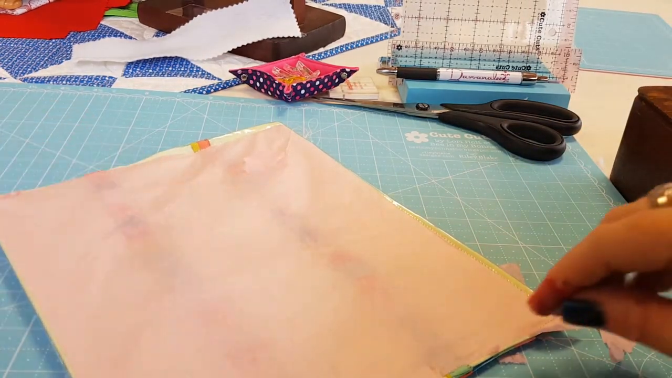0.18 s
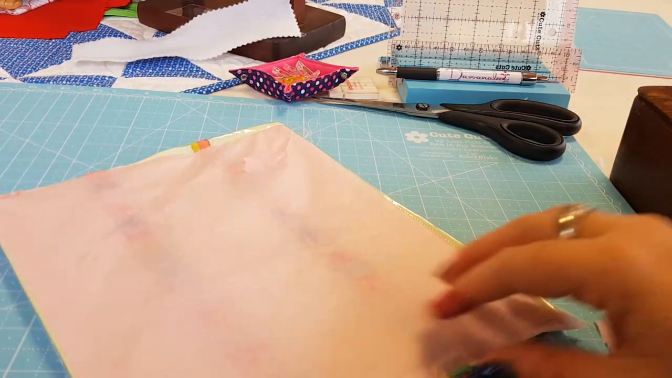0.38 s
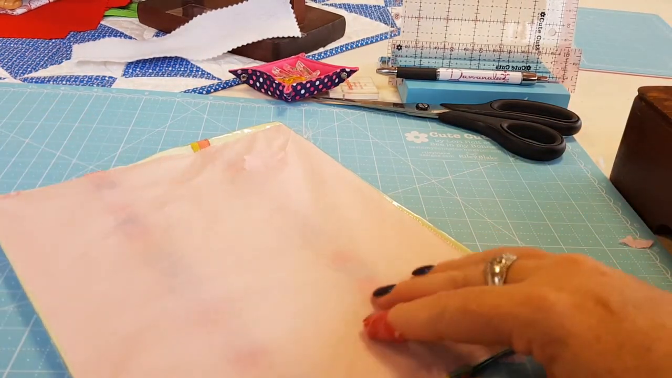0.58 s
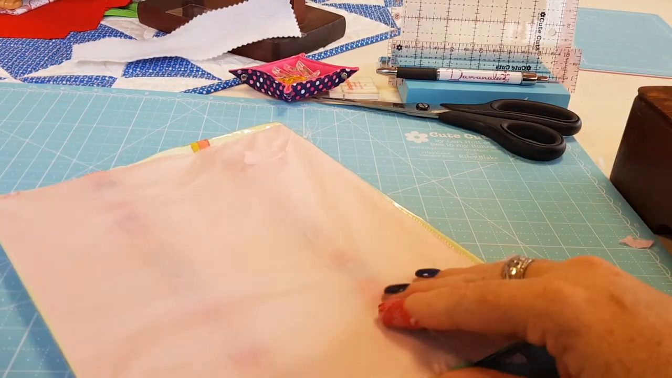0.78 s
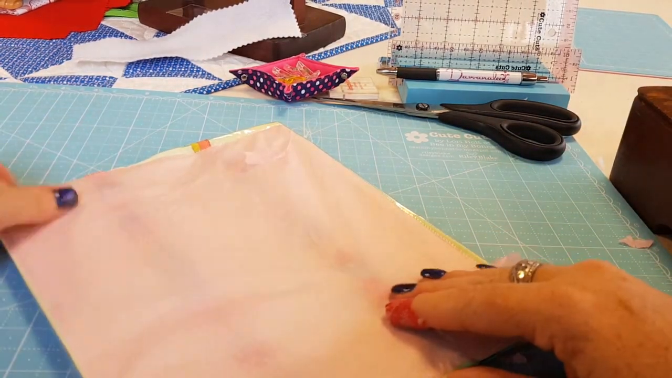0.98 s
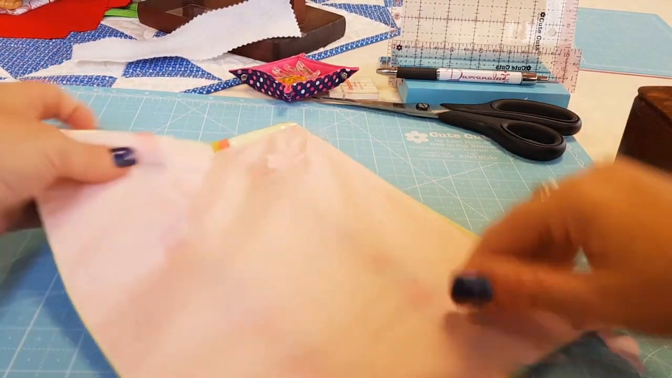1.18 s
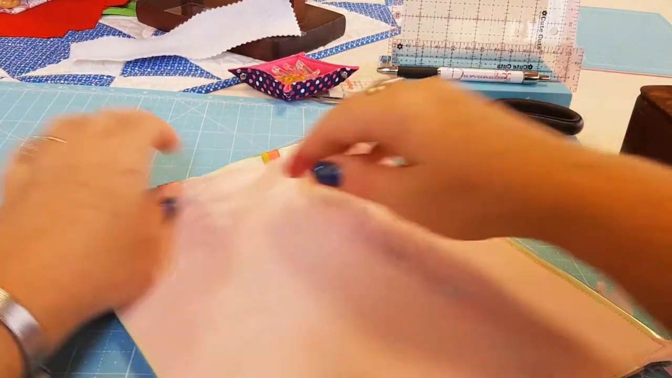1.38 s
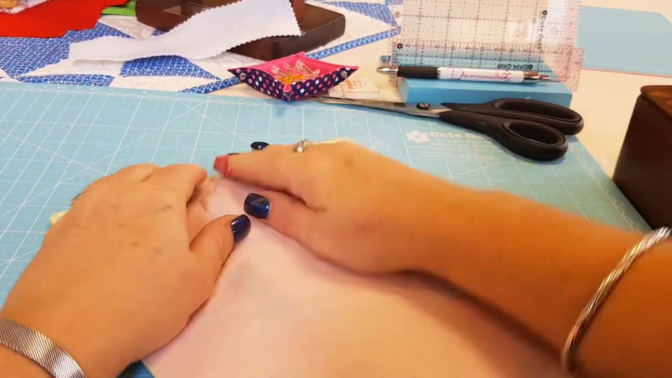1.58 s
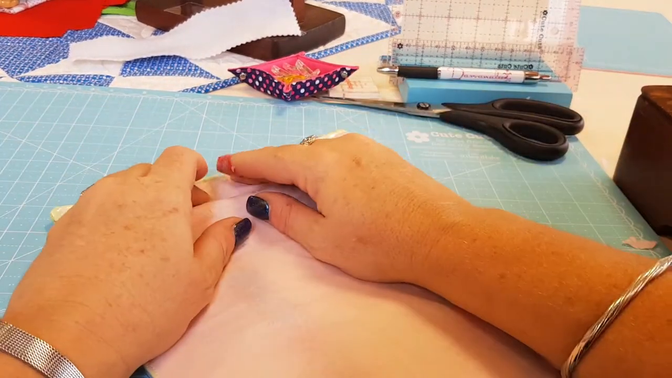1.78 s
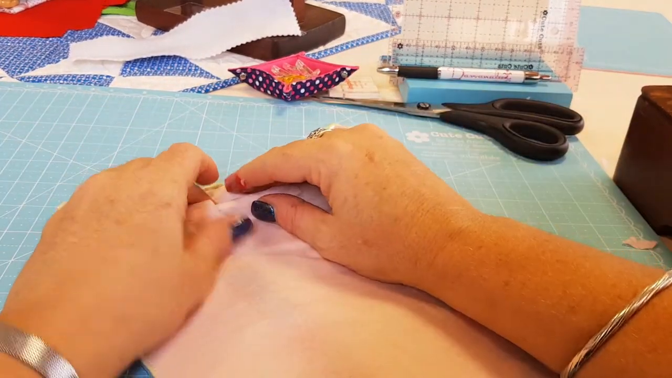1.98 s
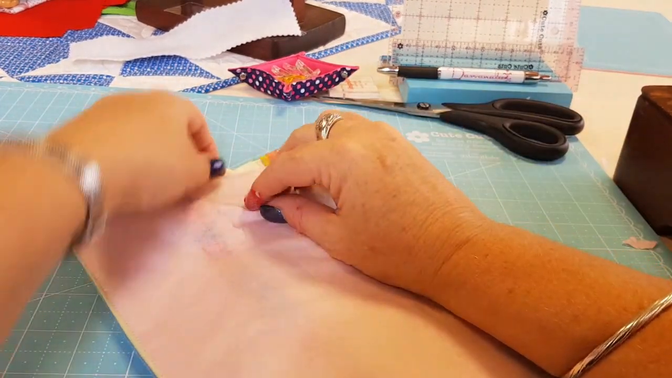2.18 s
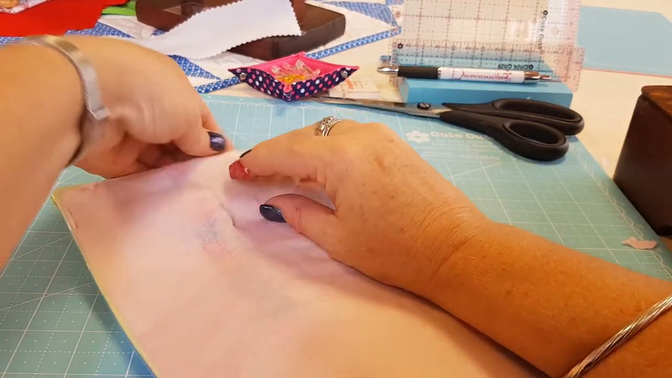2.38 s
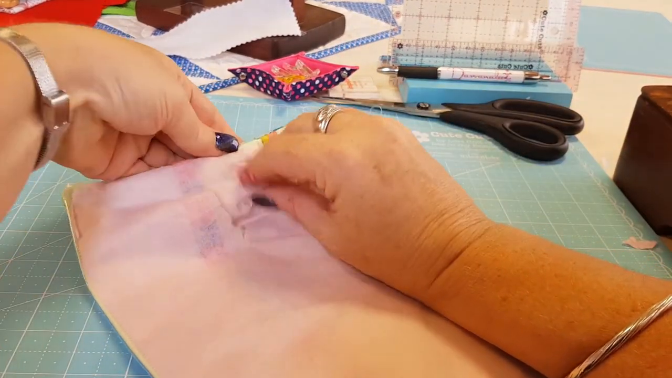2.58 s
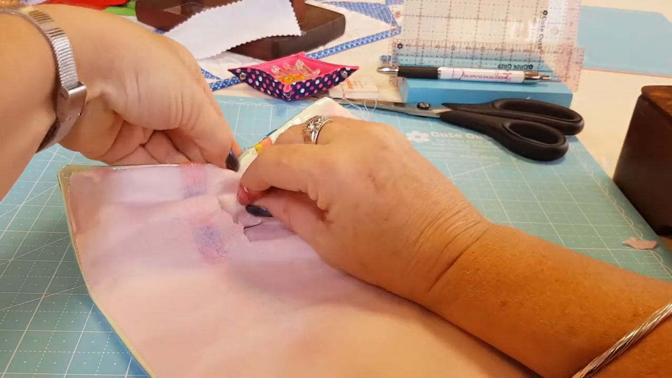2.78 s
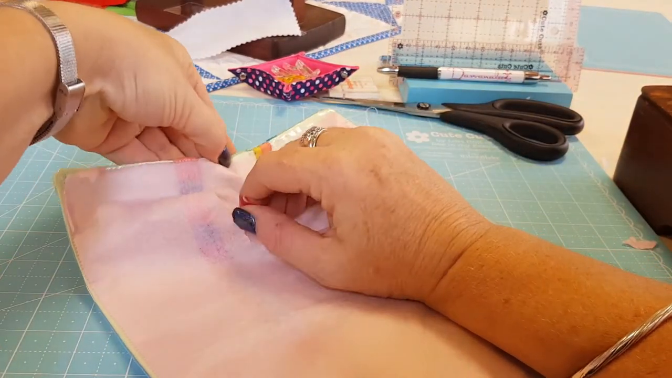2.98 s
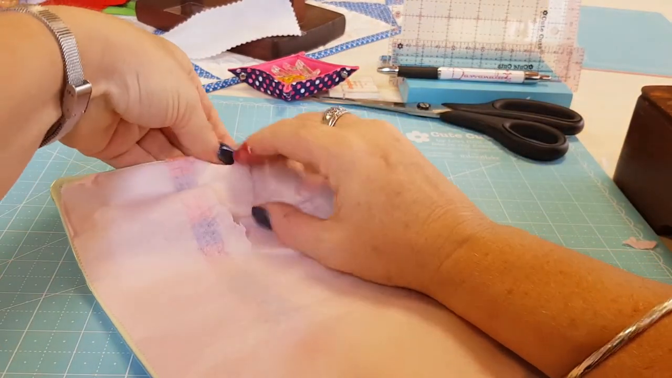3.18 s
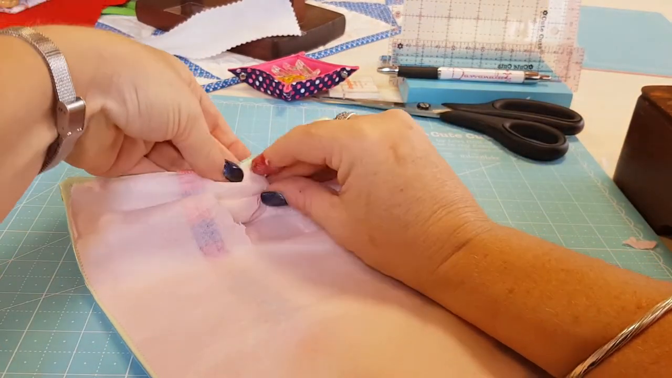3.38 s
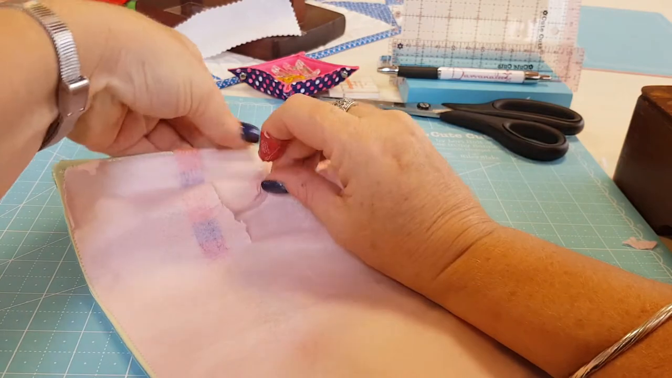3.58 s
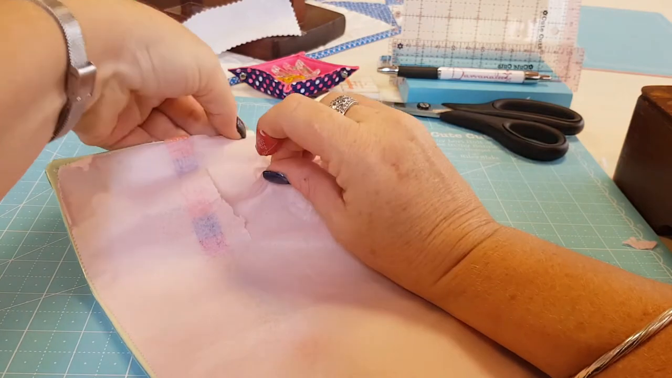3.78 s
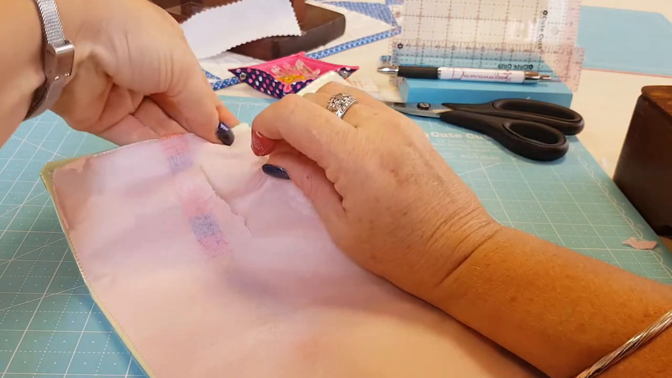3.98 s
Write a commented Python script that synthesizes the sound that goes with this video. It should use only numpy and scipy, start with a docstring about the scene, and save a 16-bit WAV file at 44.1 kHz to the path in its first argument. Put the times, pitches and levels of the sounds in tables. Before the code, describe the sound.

Thin tissue paper is handled and torn close to stereo microphones in a small room with faint low hum. Brief crackle at 0 s, snaps with dull table knocks at 0.2-0.35, low air puffs on the left around 0.8 and 1.0, sharp nail taps at 0.9. Crisp rips at 1.05-1.3, softer rustling with light knocks to 2.1, a thump at 2.1, then dense irregular snapping and crinkling from 2.25 to 4.

```python
"""Hands handle and tear thin tissue paper on a craft table, close to two microphones in a small room.
From the start an appliance hums over soft room noise and the paper crackles: clumps of tiny fibre breaks and
creases. At 0.2 s come the first snaps (noise bursts with a ring) and hand knocks (ringing table modes). Air
puffs (short damped swings) then reach the left microphone, and near 0.9 s nails tap the mat (a dent and a
click). More snaps follow, crowded after 2.2 s. The walls answer paper, taps and knocks with fading noise."""
import sys
import numpy as np
from scipy import signal
from scipy.fft import rfft, irfft, next_fast_len
from scipy.io import wavfile
from scipy.ndimage import map_coordinates

SR = 44100
rng = np.random.default_rng(int(sys.argv[2]) if len(sys.argv) > 2 else 0)


def materialize(psi):
    """Save the field psi as 16-bit PCM at rate SR to the path in sys.argv[1].

    A 1-D psi becomes a single channel; in a 2-D psi each row is a channel.
    """
    bounded = np.clip(np.atleast_2d(psi).T, -1, 1)
    quanta = np.round(bounded * 32767).astype(np.int16)
    wavfile.write(sys.argv[1], SR, quanta)


def level_to_linear(level):
    """Convert decibel levels to linear amplitude factors, elementwise."""
    exponent = np.asarray(level, float) / 20
    return 10 ** exponent


N = 176400  # samples, 4 s


def unit(x):
    """Scale to rms 1."""
    return x / np.sqrt(np.mean(x ** 2) + 1e-20)


def along(points, hz):
    """Read a curve of (frequency, value) points on a log frequency axis."""
    f, v = np.transpose(points)
    return np.interp(np.log(hz + 1), np.log(f + 1), v)


def wobble(rate):
    """A smooth random curve through a given number of random points a second."""
    return map_coordinates(rng.standard_normal(4000), [np.arange(N) * rate / SR])


def filtered(x, response):
    """Multiply the spectrum of x by a response that depends on frequency."""
    m = next_fast_len(N + SR // 2)
    return irfft(rfft(x, m) * response(np.fft.rfftfreq(m, 1 / SR)), m)[..., :N]


def pan(db):
    """Left and right gains for a left-right difference in dB."""
    return level_to_linear(np.array([db / 2, -db / 2]))


def add(out, s, sound):
    """Mix a stereo sound in at time s."""
    part = out[:, max(round(s * SR), 0):][:, :sound.shape[1]]
    part += sound[:, :part.shape[1]]


# how far the left microphone hears the hands ahead of the right: time_s, lead_samples
LEFT_LEAD = [(0, 12), (.7, 13), (1.2, 6), (4, 3.8)]


def lead(s):
    """Samples by which sound from the working hands reaches the left microphone first."""
    return np.interp(s, *np.transpose(LEFT_LEAD))


# how much louder the paper is on the left: time_s, left_over_right_db
LEFT_LEAN = [(.25, 3), (.55, 1), (.95, 2.5), (1.3, 1), (2.3, 1.1), (4, 1.5)]


def lean_db(s):
    """Left-right level difference of the paper at time s."""
    return np.interp(s, *np.transpose(LEFT_LEAN))


def both_arrivals(at, scatter):
    """Arrival samples at left and right; scatter stands for each break's own place on the paper."""
    right = np.clip(at + lead(at / SR) + 4.1 * scatter, 0, N - 1)
    return at.astype(int), right.astype(int)


# how alike the two microphones hear the room: pitch_hz, likeness (1 = the same, 0 = unrelated)
LIKENESS = [(40, 0.9), (100, 1), (300, 0.95), (600, 0.15), (1500, 0.074), (5000, 0.048)]
# tones of the appliance: pitch_hz, level_db (rms before the wavering)
HUM_TONES = [(48.4, -49.5), (96.9, -55.5), (145.3, -56), (301.5, -69.5), (387.6, -74.5), (586.8, -68.5)]


def hum():
    """An appliance motor gives steady tones that waver slightly in level and phase."""
    t = np.arange(N) / SR
    tones = np.zeros(N)
    for hz, db in HUM_TONES:
        level = np.sqrt(2) * level_to_linear(db + 2.5 * wobble(5.46))
        phase = 0.2 * wobble(3.9) + rng.uniform(0, 2 * np.pi)
        tones += level * np.sin(2 * np.pi * hz * t + phase)
    late = np.roll(tones, round(0.0017 * SR))  # the right hears it 1.7 ms later
    return pan(0.6)[:, None] * np.array([tones, late])


# tone colour of the room noise: pitch_hz, relative_level_db (per Hz)
ROOM_NOISE = [(25, -9.5), (45, -15), (75, -9.5), (120, -12), (200, -13), (335, -17), (430, -17), (641, -20),
              (800, -32.5), (1130, -42), (2000, -42.5), (4250, -50.5), (7000, -54), (16000, -50)]


def room_tone():
    """Stereo noise with a drifting level; a shared and an opposed part make the low end alike."""
    def shape(hz):
        turn = np.arccos(np.clip(along(LIKENESS, hz), -1, 1)) / 2
        return level_to_linear(along(ROOM_NOISE, hz)) * [np.cos(turn), np.sin(turn)]
    mid, side = filtered(rng.standard_normal((2, N)), shape)
    level_db = -50.5 + 4.1 * wobble(4.95)
    return level_to_linear(level_db) * unit(np.array([mid + side, mid - side]))


def crackle(count, spread_db, spectrum):
    """Fibres break at random times and sizes; each break is a tiny cluster of clicks."""
    at = rng.random(count) * N
    size = level_to_linear(spread_db * rng.standard_normal(count)) * rng.choice([-1, 1], count)
    arrivals = both_arrivals(at, rng.standard_normal(count))
    hits = np.array([np.bincount(p, size, N) for p in arrivals])

    def burst(hz):
        grain_s = 0.000589  # spacing of the clicks in a cluster
        smear = np.exp(2j * np.sin(2 * np.pi * hz * grain_s))  # spreads in time, keeps the colour
        return smear * level_to_linear(along(spectrum, hz))
    own_clumps = level_to_linear(1 * wobble(200))
    return unit(own_clumps * filtered(hits, burst))


def flutter(count):
    """Creases pop as short damped rings, each with its own pitch, size and place."""
    t = np.arange(SR // 300)[None]  # samples
    at = rng.random(count) * N
    pitch, size, scatter, phase = rng.standard_normal((4, count, 1))
    hz = np.clip(3000 * 2 ** (0.81 * pitch), 1150, 15000)
    life = 5.7 * SR / hz  # 5.7 cycles, in samples
    fade = np.exp(-t / life) * (1 - np.exp(-t / 4))
    ring = level_to_linear(5.5 * size) * np.sin(2 * np.pi * hz * t / SR + 9 * phase) * fade
    arrivals = both_arrivals(at, scatter[:, 0])
    return unit(np.array([np.bincount((p[:, None] + t).ravel(), ring.ravel(), N + SR)[:N]
                          for p in arrivals]))


# pull on the paper: time_s, effort_db, crispness_db (tilts from sheet flutter towards fibre ticks)
PULLS = [(0.0, -49.5, -7), (0.09, -77.5, 12), (0.191, -74.5, -3), (0.208, -45.5, -1.5), (0.31, -59, -14.5),
         (0.41, -71, -8), (0.52, -65.5, -9), (0.555, -66, -1), (0.58, -50.5, 7), (0.62, -58.5, 1),
         (0.66, -65.5, 4), (0.87, -75, -12), (0.93, -65.5, -11), (0.96, -55.5, -17), (1.05, -50, 1),
         (1.17, -48, 4.5), (1.26, -55, -5), (1.281, -41, 1), (1.305, -50.5, -3.5), (1.338, -56.5, 5),
         (1.54, -48.5, -5), (1.69, -53, -1.5), (2.13, -48.5, -3), (2.27, -62, 5.5), (2.33, -46, 12.5),
         (2.361, -59.5, 0.5), (2.568, -42.5, 1), (2.7, -54, 1), (2.881, -44.5, -2), (3.02, -55.5, -3),
         (3.2, -42.5, 1.5), (3.52, -56.5, -5.5), (3.65, -49, 0), (3.75, -61, -4), (3.82, -57.5, 2),
         (3.85, -57, -0.5), (3.97, -58.5, -2), (4.0, -51.5, 5)]
# tone colour of the crisp fibre ticks: pitch_hz, relative_level_db (per Hz)
TICK_COLOUR = [(1500, -13), (3000, -19), (4600, -7.5), (7000, -2), (9000, -4), (11500, -1), (14000, -4),
               (16000, -7)]
# tone colour of the duller sheet flutter: pitch_hz, relative_level_db (per Hz)
SHEET_COLOUR = [(290, -20), (500, -4.5), (592, 0.5), (972, -14), (1410, 1), (1700, -1), (2320, 0),
                (3500, -3.5), (6040, -13), (8500, -12.5), (12000, -16), (19800, -120)]


def paper():
    """The pull drives crisp fibre ticks and the duller sheet with its pops; both come in clumps."""
    now = np.arange(N) / SR
    s, *cols = np.transpose(PULLS)
    effort_db, crisp_db = [np.interp(now, s, c) for c in cols]
    clumps = unit(level_to_linear(2.2 * wobble(200)))
    # over 4 s: 5000 ticks, 3000 flutters and 900 pops a second
    ticks = level_to_linear(-0.5 + crisp_db / 2) * crackle(4 * 5000, 6.5, TICK_COLOUR)
    sheet = crackle(4 * 3000, 5, SHEET_COLOUR) + level_to_linear(-5) * flutter(4 * 900)
    sheet = level_to_linear(-1.5 - crisp_db / 2) * sheet
    return clumps * level_to_linear(effort_db) * pan(lean_db(now)) * (ticks + sheet)


# single loud breaks: start_s, level_db, pitch_hz (of the sheet), length_ms (it is loudest a third in)
LOUD_BREAKS = [(0.204, -39, 1720, 3.4), (0.2833, -35.5, 4180, 3.3), (0.397, -60, 2600, 1.7),
               (0.551, -48, 5000, 2.2), (0.5205, -45.5, 2230, 2.2), (0.673, -52, 4230, 3.6),
               (0.7083, -48, 4270, 1.8), (0.7517, -54.5, 3320, 3.1), (1.057, -34, 7400, 6.2),
               (1.078, -34.5, 2840, 4.8), (1.103, -43, 12200, 3), (1.1474, -31.5, 11400, 1.9),
               (1.155, -31, 12000, 1.9), (1.216, -38.5, 10000, 2), (1.242, -40, 10100, 2.3),
               (1.263, -33, 1980, 4.4), (1.5294, -32, 2060, 3), (1.861, -33.5, 1410, 3.5),
               (1.875, -33, 1440, 2), (1.887, -37, 2000, 2.5), (1.97, -50, 1400, 4.1),
               (2.2546, -36, 3840, 1.5), (2.288, -38, 5200, 2.5), (2.3256, -28, 4910, 1.1),
               (2.395, -36.5, 2240, 3.7), (2.457, -36.5, 5340, 2.3), (2.4851, -27, 5330, 1.7),
               (2.509, -28.5, 1880, 2.2), (2.5475, -43.5, 1420, 5), (2.573, -26, 3970, 9.5),
               (2.625, -27.5, 6040, 5.4), (2.66, -31.5, 6050, 1.7), (2.6844, -36.5, 6400, 1.5),
               (2.7313, -31.5, 3070, 2.4), (2.804, -31.5, 11100, 2.3), (3.1025, -32, 4900, 2.7),
               (3.188, -31.5, 7040, 2.8), (3.242, -46, 11000, 1.7), (3.26, -43, 12500, 3.3),
               (3.27, -31, 2200, 3.2), (3.3214, -34.5, 3400, 3.8), (3.337, -33, 11800, 2.8),
               (3.377, -33.5, 6500, 2.2), (3.405, -35, 8900, 1.9), (3.432, -37.5, 5900, 2.5),
               (3.497, -35, 4200, 1.1), (3.524, -38.5, 7900, 4), (3.5698, -36, 3030, 7.7),
               (3.6014, -35.5, 1760, 7), (3.621, -39, 9000, 2.5), (3.632, -30.5, 3000, 4.8),
               (3.65, -30.5, 1950, 3.1), (3.78, -35.5, 8100, 2.6), (3.8002, -36, 7000, 3.9),
               (3.8154, -30.5, 2180, 1.9), (3.928, -42, 4340, 3.6), (3.958, -30.5, 2000, 2.8)]


def snaps():
    """A break is a short broad crack that swells and dies, part of it ringing at the sheet's pitch."""
    ring_db, crack_db = -3.479, -5.598
    span = 3.2  # the crack reaches this many times below and above the pitch
    out, t = np.zeros((2, N)), np.arange(SR // 25) / SR
    for s, db, hz, ms in LOUD_BREAKS:
        u = 3 * t / (np.clip(ms, 1, 30) / 1000)
        noise = rng.standard_normal((3, len(t))) * u * np.exp(1 - u)
        band = [hz / span, min(hz * span, SR // 2 - 1000)]
        noise = signal.lfilter(*signal.butter(1, band, 'band', fs=SR), noise)
        ring = signal.lfilter(*signal.iirpeak(hz, 3.5, SR), noise[0])
        shared = level_to_linear(ring_db) * ring / np.abs(ring).max() + level_to_linear(crack_db) * noise[0]
        pair = np.array([shared, np.roll(shared, int(lead(s)))])
        pair += level_to_linear(crack_db) * noise[1:]  # each microphone's own part
        add(out, s, level_to_linear(db) * pan(lean_db(s))[:, None] * pair)
    return out


# hands on the table: start_s, level_db, pitch_hz (of the spot that is hit)
HAND_KNOCKS = [(.204, -29.5, 375), (.21, -23.5, 375), (.221, -22, 330), (0.227, -21.5, 132),
               (.2665, -17.5, 360), (0.267, -19, 930), (.284, -25, 260), (0.311, -21, 112),
               (.335, -33.5, 90.5), (0.904, -27.5, 216), (0.933, -28, 950), (0.96, -29, 1130),
               (1.759, -31, 297), (1.773, -35, 453), (1.86, -29, 535), (1.874, -39.5, 460),
               (1.885, -36, 300), (1.971, -32, 590), (1.98, -34, 344), (2.118, -20, 318), (2.127, -36, 233),
               (2.146, -33, 330), (2.5, -29.5, 89), (3.536, -37, 545), (3.632, -33.5, 243)]
# ringing modes of the table top: pitch_hz, level_db, fade_s (time to fall by 60 dB)
TABLE_MODES = [(75, 2.5, 0.19), (116.3, 0.5, 0.1), (143.1, -10, 0.27), (182, -5, 0.14), (285.4, -9, 0.11),
               (330, -2, 0.036), (393.5, -0.5, 0.039), (469, -4, 0.042), (545, -7, 0.056), (707, -5, 0.033),
               (930, -9, 0.038), (1150, -14.5, 0.068)]


def table():
    """Each soft knock rings the table's modes, most those near its pitch; low modes swell more slowly."""
    out, t = np.zeros((2, N)), np.arange(SR // 3) / SR
    for s, db, spot_hz in HAND_KNOCKS:
        ring = np.zeros(len(t))
        for hz, level, t60 in TABLE_MODES:
            level_scatter, pitch_scatter = rng.standard_normal(2)
            off_spot_db = 10 * abs(np.log2(hz / spot_hz))  # 10 dB an octave
            fade = level_to_linear(level - off_spot_db + 1.5 * level_scatter - 60 * t / t60)
            swell = 1 - np.exp(-t * hz / 0.62)
            ring += fade * swell * np.sin(2 * np.pi * hz * (1 + 0.053 * pitch_scatter) * t)
        pair = np.array([ring, np.roll(ring, int(lead(s) / 3))])
        add(out, s, -level_to_linear(db - 0.5) * pan(1)[:, None] * pair)
    return out


# air puffs in the left microphone: start_s, level_db, pitch_hz
AIR_PUFFS = [(.764, -15, 109), (0.7746, -15.5, 127), (0.779, -17, 120), (0.802, -16, 100),
             (0.826, -18.5, 105), (0.8394, -15.5, 112), (0.988, -17.5, 106), (1.001, -20.5, 109),
             (1.018, -13, 111), (1.078, -23.5, 75), (1.291, -31, 90.5), (2.209, -19.5, 99),
             (2.527, -29, 83), (0.452, -35, 78.4), (0.571, -37, 80.4)]


def puffs():
    """Moving air gives one push and its swing back, 34 dB weaker on the right."""
    out, t = np.zeros((2, N)), np.arange(SR // 10) / SR
    for s, db, hz in AIR_PUFFS:
        fade = np.exp(-t * hz / 0.89) * (1 - np.exp(-t * hz * 9))
        push = np.sin(2 * np.pi * hz * t) * fade
        add(out, s, level_to_linear([[db], [db - 34]]) * push)
    return out


# fingernails tapping the mat on the left: start_s, level_db
NAIL_TAPS = [(0.8851, -33), (0.907, -29), (0.9286, -21.5), (0.935, -15)]


def taps():
    """A tap is a sharp dent of the mat and the short click of the nail."""
    dent_hz, nail_hz, nail_db, nail_s = 460, 3320, -3.5, 0.0003
    out, t = np.zeros((2, N)), np.arange(SR // 50) / SR
    dent = -np.sin(2 * np.pi * dent_hz * t) * np.exp(-t * dent_hz / 0.24)
    rise = 1 - np.exp(-t / 0.00008)  # each tap starts softly
    for s, db in NAIL_TAPS:
        hz = nail_hz * rng.normal(1, 0.062)
        click = dent + level_to_linear(nail_db) * np.sin(2 * np.pi * hz * t) * np.exp(-t / nail_s)
        pair = np.array([click, np.roll(click, int(lead(s)))])
        add(out, s, level_to_linear(db) * rise * pan(10)[:, None] * pair)
    return out


# how fast the room's answer dies: pitch_hz, fade_s (time to fall by 60 dB)
WALL_FADE = [(150, 0.36), (1500, 0.14), (10000, 0.056)]


def walls(x):
    """The room answers with noise, each pitch dying at its own speed; the low part is shared."""
    hz, t, z = signal.stft(rng.standard_normal((2, SR // 2)), SR, nperseg=256)
    shared = np.clip(along(LIKENESS, hz), 0, 1)[:, None]
    z = np.array([z[0], shared * z[0] + np.sqrt(1 - shared ** 2) * z[1]])
    fade = level_to_linear(-60 * t / along(WALL_FADE, hz)[:, None])
    tail = signal.istft(z * fade, SR, nperseg=256)[1]
    late = np.pad(x, ((0, 0), (130, 0)))  # the answer starts 130 samples (3 ms) later
    return signal.fftconvolve(late, tail / np.linalg.norm(tail[0]), axes=1)[:, :N]


def scene():
    """All sources, with the room's answer to the tissue, taps and table."""
    background = hum() + room_tone()
    tissue = paper() + snaps() + taps()
    wood = table()
    echo = walls(level_to_linear(-8.5) * tissue + level_to_linear(-7.5) * wood)
    return background + tissue + wood + puffs() + echo


def top_cut(x):
    """Nothing passes above the cut-off."""
    return signal.sosfilt(signal.butter(12, 15960, fs=SR, output="sos"), x)


# colour of the microphones: pitch_hz, gain_db
MIC_COLOUR = [(2350, -0.5), (2800, -3.5), (3350, 2), (4100, 1), (5600, 2.5), (8000, -6), (11000, -4)]


def record(dry):
    """The microphones cut the lows and colour the sound; a band limit then keeps only what is below 15960 Hz."""
    low_cut_hz, band_limit_hz = 29, 15960

    def colour(hz):
        low_cut = (1j * hz / (low_cut_hz + 1j * hz)) ** 2
        return low_cut * level_to_linear(along(MIC_COLOUR, hz))

    def response(hz):
        return colour(hz) * (hz < band_limit_hz)
    mix = filtered(dry, response)
    return top_cut(mix)


dry = scene()
out = record(dry)
materialize(out)
```